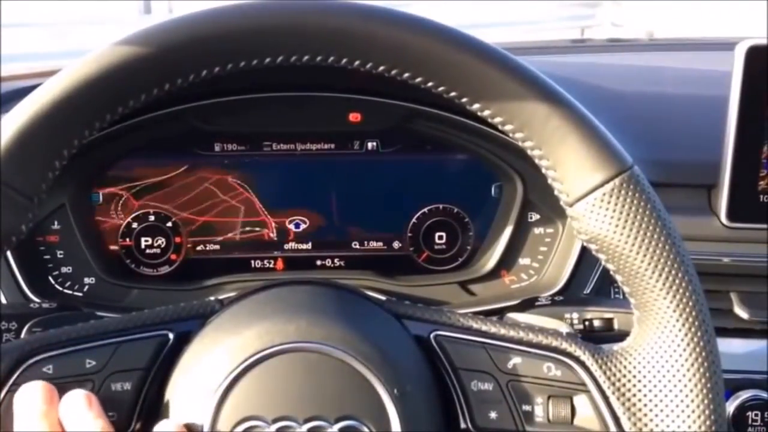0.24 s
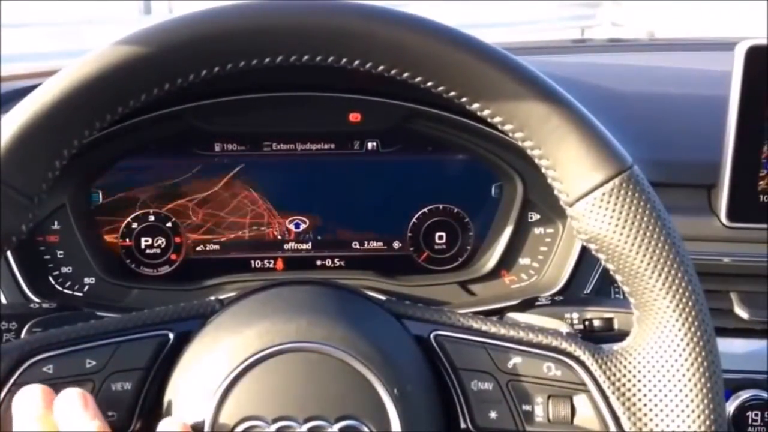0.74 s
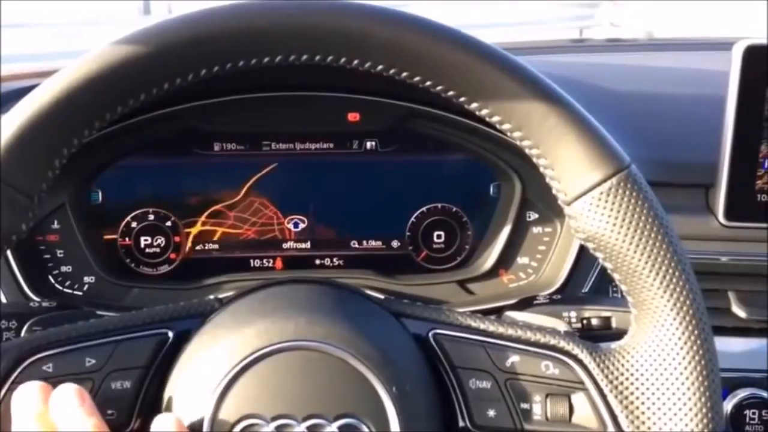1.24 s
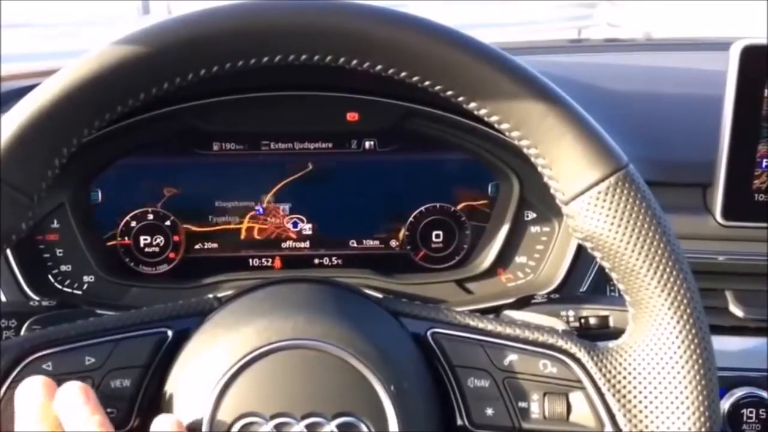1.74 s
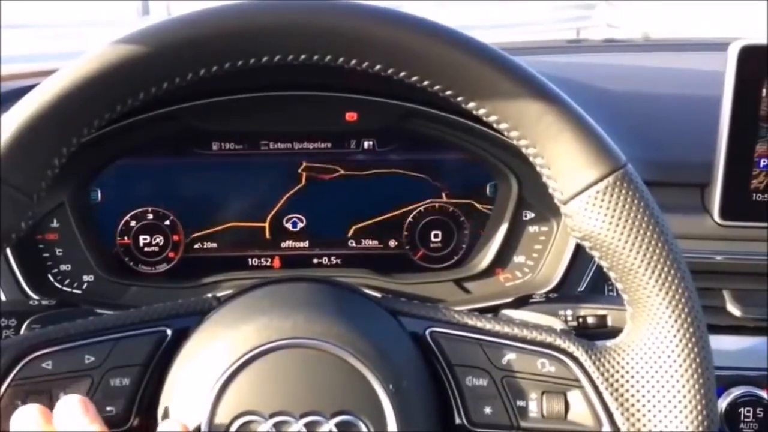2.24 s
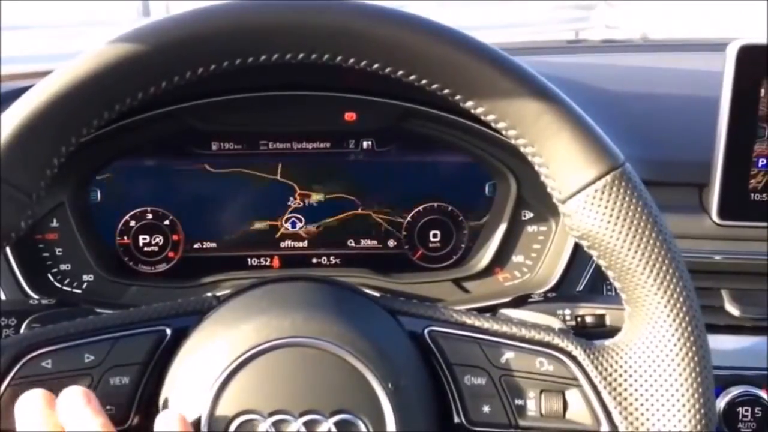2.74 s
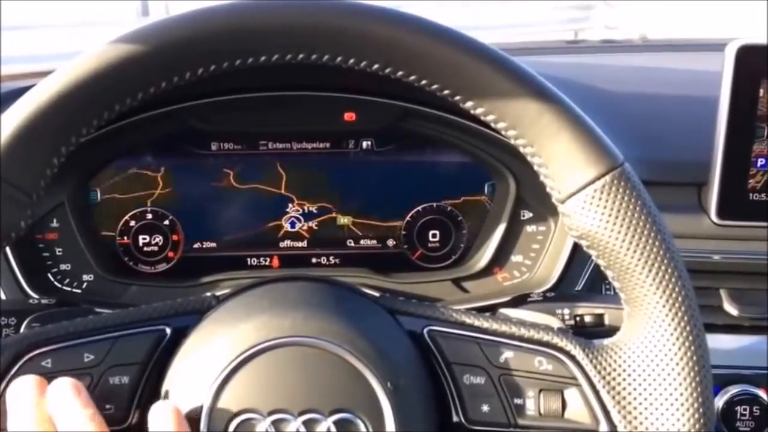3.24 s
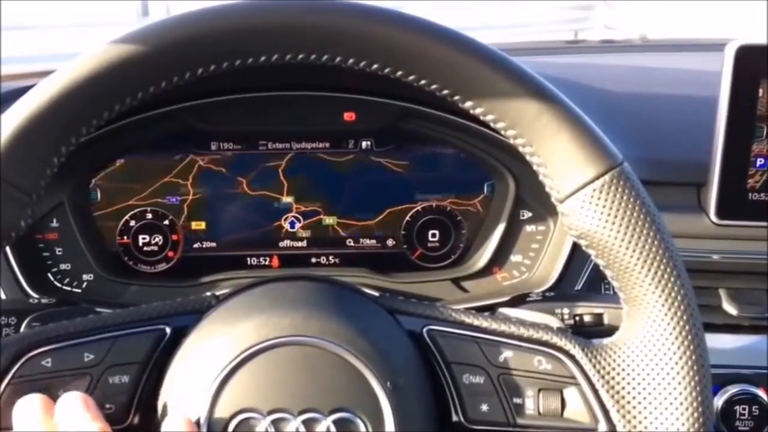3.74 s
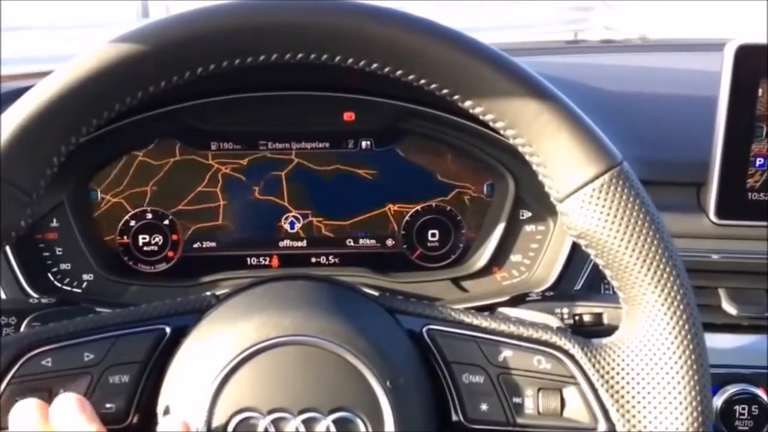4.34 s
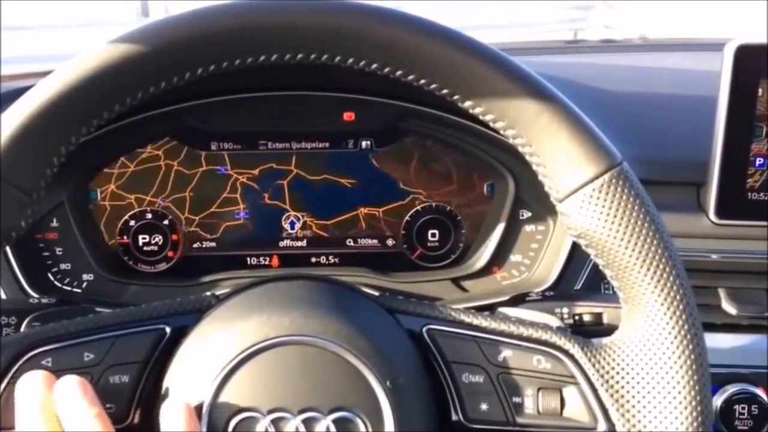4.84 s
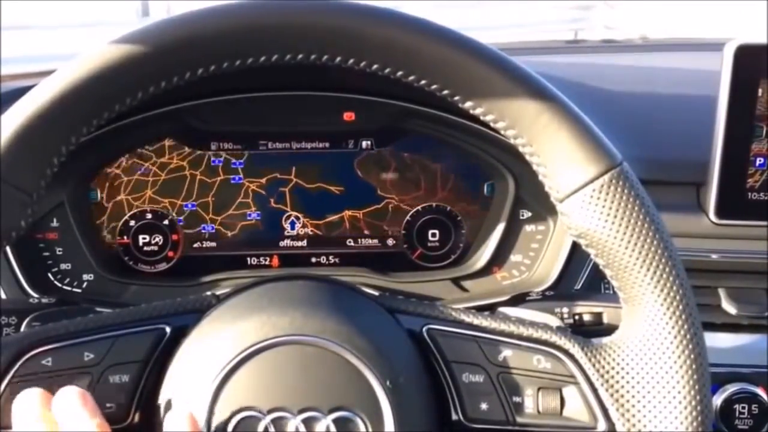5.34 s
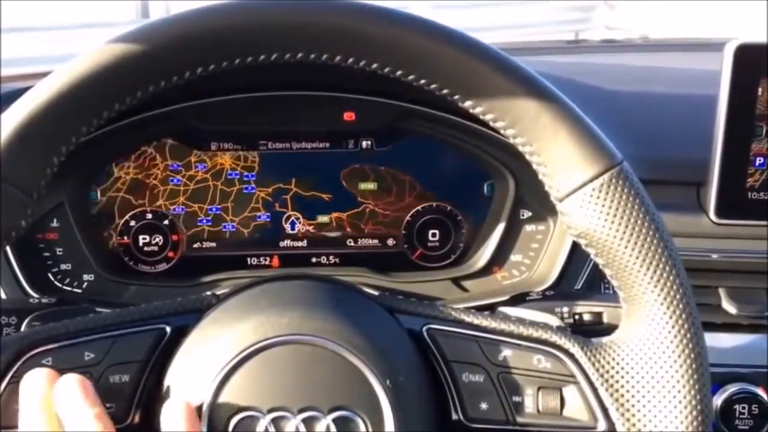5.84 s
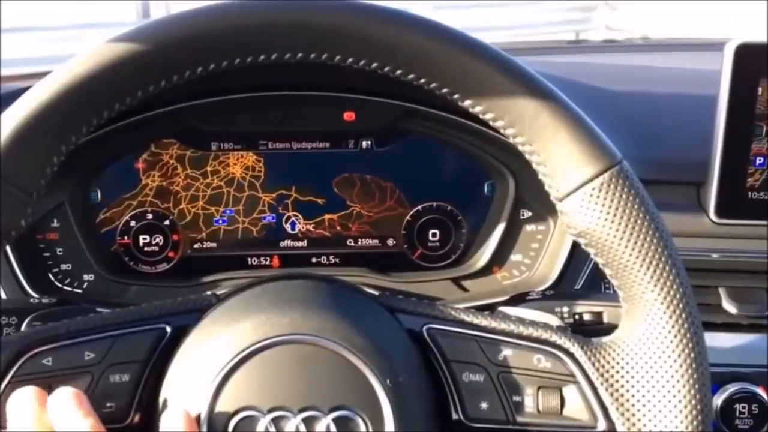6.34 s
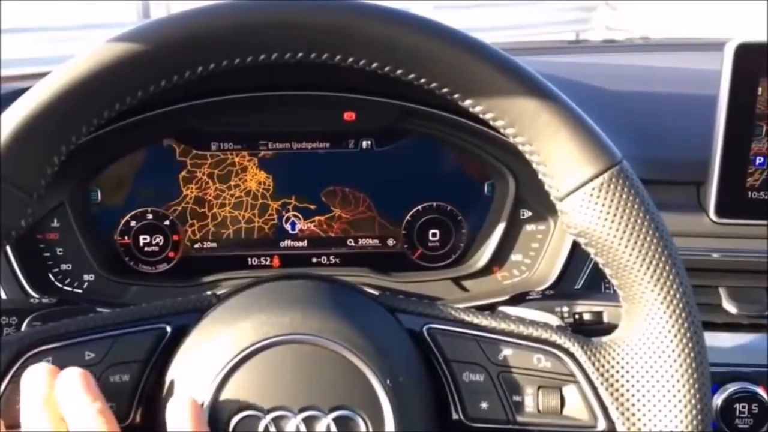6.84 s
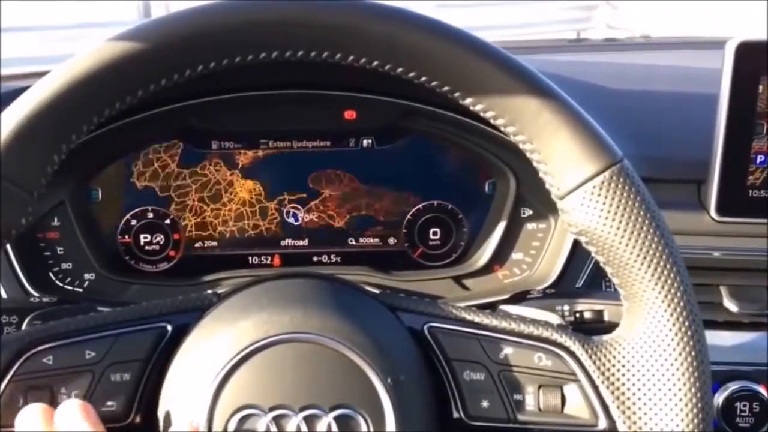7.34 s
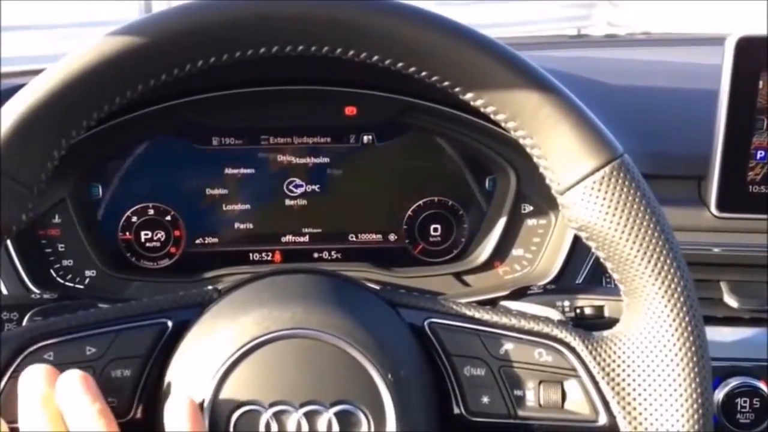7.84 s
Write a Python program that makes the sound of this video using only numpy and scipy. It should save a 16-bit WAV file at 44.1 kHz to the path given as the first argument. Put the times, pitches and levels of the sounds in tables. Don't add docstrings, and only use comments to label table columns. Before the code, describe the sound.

A thumbwheel on a steering wheel ratchets in quick, dry little bursts over the low steady drone of an idling parked car.

```python
import sys
import numpy as np
from scipy import signal
from scipy.fft import rfft, irfft, next_fast_len
from scipy.io import wavfile

SR = 44100
rng = np.random.default_rng(int(sys.argv[2]) if len(sys.argv) > 2 else 0)


def amplitude_ratio(level_db):
    exponent = np.asarray(level_db, float) / 20
    return 10 ** exponent


def waveform_to_disk(signal):
    frames = np.transpose(np.atleast_2d(signal))
    scaled = np.clip(frames, -1, 1) * 32767
    samples = np.round(scaled).astype(np.int16)
    wavfile.write(sys.argv[1], SR, samples)


N = 357210

FIRING_HZ = 28.6
DROPOUT_HALF = 941
# (fullest [s], dying away [s], skin rub [dB], grip on the spoke [dB],
# lowest wheel peak against rattle [dB])
THUMB_STROKES = [(.295, .045, -76, 0, -6), (.777, .22, -74, 3, -9), (1.306, .115, -73, 2, -11),
                 (1.74, .13, -70, 3, -11), (2.116, .32, -75.5, 4, -3), (2.513, .2, -73.5, 4, -18),
                 (2.92, .13, -70, -1, -20), (3.31, .19, -71.5, 2, -7), (3.673, .21, -70.5, 0, -8),
                 (4.007, .053, -71.5, 4, -18), (4.212, .04, -76, 0, -11), (4.326, .054, -64.5, 0, -19),
                 (4.642, .21, -69.5, 2, -8), (4.967, .18, -72, -1, -10), (5.322, .1, -68.5, 0, -12),
                 (5.645, .075, -67.5, 0, -20), (5.952, .18, -71.5, 2, -17), (6.545, .018, -64, 0, -5),
                 (6.625, .05, -76, 2, -14), (6.917, .17, -67, 3.5, -5), (7.243, .21, -67, 4.5, -16),
                 (7.614, .19, -63.5, 0, -20), (7.97, .03, -72, 3, -12), (8.004, .036, -63.5, 0, -8)]


def rms_one(x):
    return x / np.sqrt(np.mean(x ** 2) + 1e-20)


def level_curve(rows):
    s, level_db = np.transpose(rows)
    return amplitude_ratio(np.interp(np.arange(N) / SR, s, level_db, -200, -200))


def coloured(spectrum):
    size = next_fast_len(N)
    hz, level_db = np.transpose(spectrum)
    bins_hz = np.arange(size // 2 + 1) * SR / size
    shape_db = np.interp(np.log(bins_hz + 1e-3), np.log(hz), level_db, -90, -90)
    return rms_one(irfft(rfft(rng.standard_normal(size)) * amplitude_ratio(shape_db), size)[:N])


def drift(rate):
    r = np.exp(-80 * np.pi * rate / SR)
    slow = signal.lfilter([1], [1, -2 * r, r * r], rng.standard_normal(N // 40 + 4002))
    slow = slow[4000:]
    return np.interp(np.arange(N) / 40, np.arange(len(slow)), rms_one(slow))


def resonance(x, hz, width):
    r = np.exp(-np.pi * width / SR)
    poles = [1, -2 * r * np.cos(2 * np.pi * hz / SR), r * r]
    return signal.lfilter([(1 - r * r) / 2, 0, (r * r - 1) / 2], poles, x)


def grit(spread_db):
    noise = rng.standard_normal(N)
    return rms_one(noise * amplitude_ratio(spread_db * np.minimum(rng.exponential(1, N), 4)))


def engine():
    # (multiple of the firing rate [1], level [dB rms])
    order_levels = [(1, -62), (1.5, -65.5), (2, -51.5), (3, -56.5), (3.5, -76.5), (4, -63.5), (5, -78),
                    (6, -71), (8, -78.5), (9, -72), (10, -76), (11, -85.5), (12, -68), (13, -71.5),
                    (15, -85), (17, -89.5)]
    # (frequency [Hz], level [dB rms])
    auxiliary = [(45, -75.5), (68, -62.5), (117, -63.5), (266, -79), (293, -78.5)]
    turn = 2 * np.pi * np.arange(N) / SR
    tones = [(FIRING_HZ * order, db) for order, db in order_levels] + list(auxiliary)
    wander = 0.0071 * drift(0.2)
    waver = [drift(4.4), drift(1.3), drift(0.94)]
    out = np.zeros(N)
    for k, (hz, db) in enumerate(tones):
        start = np.pi / 2 * (hz / FIRING_HZ) ** 2
        level = np.sqrt(2) * amplitude_ratio(db + 0.8 * waver[k % 3])
        out += level * np.sin(hz * (turn + wander / 10) + start)
    return out


def cabin_air():
    # (frequency [Hz], density [dB per Hz])
    rumble_colour = [(20, -26.5), (28, -15), (38, -10.5), (48, -2.5), (65, -2), (95, -2), (125, -1.5),
                     (150, -7), (250, -8.5), (370, -12.5), (400, -23.5), (460, -26), (600, -33)]
    # (frequency [Hz], density [dB per Hz])
    vent_colour = [(250, -38), (430, 0), (485, -10.5), (584, -5), (822, -9.5), (865, -6.5), (1030, -11),
                   (1160, -9.5), (1260, -12), (1440, -9), (1680, -10), (1930, -12.5), (2150, -18),
                   (2310, -21), (3300, -42), (4290, -54), (7260, -120)]
    # (frequency [Hz], density [dB per Hz])
    hiss_colour = [(1590, -58), (2700, -5), (2950, -1), (3130, -1), (3670, -4), (4250, -3.5), (4820, -8.5),
                   (5220, -7), (6270, -6), (8920, -9.5), (10200, -7.5), (12100, -10.5), (15600, -11)]
    # (time [s], level [dB])
    outside_swell = [
        (0, -0.5),
        (1.5, 0),
        (3, .5),
        (4.5, 0),
        (6, 1),
        (7.3, -1),
        (7.7, 2),
        (8.1, 1),
    ]
    # (frequency [Hz], width [Hz], level [dB rms])
    vent_pipes = [(588.5, 65, -78), (972, 70, -76.5), (1170, 45, -79.5), (1414, 102, -74), (2050, 120, -82)]
    t = np.arange(N) / SR
    s, swell_db = np.transpose(outside_swell)
    swell = np.interp(t, s, swell_db - np.mean(swell_db))
    throb_db = 1.3 * np.sin(np.pi * FIRING_HZ * t)
    rumble = amplitude_ratio(-52 + swell + throb_db) * coloured(rumble_colour)
    vent = amplitude_ratio(-65 + 0.5 * drift(5)) * coloured(vent_colour)
    air = rng.standard_normal(N)
    pipes = np.zeros(N)
    for hz, width, db in vent_pipes:
        pipes += amplitude_ratio(db) * rms_one(resonance(resonance(air, hz, width), hz, width))
    return rumble + vent + pipes + amplitude_ratio(-82.5) * coloured(hiss_colour)


def thumb_rub(grip_share):
    rise_s = 0.043
    out = np.zeros(N)
    for fullest, fall, db, grip_db, _ in THUMB_STROKES:
        start, end = fullest - rise_s, fullest + fall
        at = np.arange(int(start * SR), min(int(end * SR), N))
        ramp = np.interp(at / SR, [start, fullest, end], [0, 1, 0])
        out[at] += amplitude_ratio(db + grip_share * grip_db) * np.sin(np.pi / 2 * ramp) ** 2.23
    return out


def detents():
    # (first notch [s], rattle [dB], loss a notch [dB], gaps to the next notches [s] ..)
    rolls = [(.301, -61.5, 9, .0941), (.797, -62, 5, .0413, .103), (1.2736, -61, 2, .0504, .0441),
             (1.7422, -57, 17, .0881), (2.1428, -54, 7, .026, .0438), (2.5342, -57, 7.5, .0342),
             (2.9288, -60, 3.5, .0331, .0375), (3.3217, -55, 5, .0268, .0471),
             (3.6885, -53, 7, .0265, .0393), (4.0112, -64, 2.1, .037), (4.314, -61, 2.5, .0231, .034),
             (4.645, -55, 6, .033, .0467), (4.979, -61, 5, .0386), (5.298, -60, 3, .0294, .0346),
             (5.6486, -58, 5.5, .0131, .0383), (5.9414, -65, -1.5, .0354, .0326),
             (6.534, -59, 3.5, .0155, .0266), (6.9363, -57, 4.5, .0236, .0281), (7.3199, -61, 4, .0275),
             (7.6299, -55, 4, .0199, .0185), (7.689, -61, 3.5, .0178), (8.0218, -55.5, 16, .0567)]
    # (time [s], rattle [dB])
    slips = [
        (1.491, -63.5),
        (3.0586, -67),
        (4.4296, -66.5),
        (5.9677, -69),
        (6.6114, -73),
        (6.636, -67),
        (6.921, -63),
        (6.9478, -70),
        (7.6803, -67),
        (8.005, -58),
    ]
    # (time [s], rattle [dB])
    touches = [(.6809, -71), (1.2147, -72.5), (1.6384, -73), (2.0262, -76), (2.4057, -75), (2.7904, -73),
               (3.1961, -75), (3.906, -72), (4.2097, -70), (4.5474, -71), (4.6112, -75), (4.8677, -78),
               (5.2114, -73), (5.5647, -71.5), (5.8705, -74), (6.7552, -75), (6.8402, -71), (7.197, -68.5),
               (7.2249, -70.5), (7.2588, -70), (7.5461, -68.5), (7.8992, -72), (7.9501, -74)]
    notch_spoke_db, notch_lowest_db = [-8, -13, -12], [-2, 4, -3]
    lone_lowest_db = -2.5
    rows = []
    for s, db, loss_db, *gaps in rolls:
        for k in range(len(gaps) + 1):
            rows.append((s + sum(gaps[:k]), db - k * loss_db, notch_spoke_db[k], notch_lowest_db[k]))
    rows += [(s, db, -6, lone_lowest_db) for s, db in slips]
    rows += [(s, db, -1, lone_lowest_db) for s, db in touches]
    s, rattle_db, spoke_db, lowest_db = np.transpose(rows)
    fullest, _, _, grip_db, ring_db = np.transpose(THUMB_STROKES)
    spoke_db = spoke_db + 0.8 * np.interp(s, fullest, grip_db)
    return s, rattle_db, spoke_db, lowest_db + np.interp(s, fullest, ring_db)


def detent_shape(rise_s, fall_s, skirt_db, skirt_s):
    t = np.arange(-1300, 1301) / SR
    crest = np.exp(np.where(t < 0, t / rise_s, -t / fall_s))
    return crest + amplitude_ratio(skirt_db) * np.exp(-np.abs(t) / skirt_s)


def thumbwheel():
    # (frequency [Hz], width [Hz], level [dB])
    wheel_peaks = [(4520, 460, -1), (6200, 240, -5.5), (7880, 680, -13), (8910, 350, -3), (9800, 390, -5),
                   (11060, 340, -3.5), (13000, 340, -4.5), (14700, 1300, -20)]
    # (frequency [Hz], width [Hz], level [dB])
    spoke_peaks = [(1950, 180, 5.5), (2270, 310, 1.5), (3050, 250, .5)]
    s, rattle_db, spoke_db, lowest_db = detents()
    at = (s * SR).astype(int)
    luck = rng.standard_normal((len(s), len(wheel_peaks) + len(spoke_peaks)))
    rub, spoke_rub = thumb_rub(grip_share=0), thumb_rub(grip_share=1)
    sharp = detent_shape(rise_s=0.0024, fall_s=0.002, skirt_db=-11, skirt_s=0.007)
    soft = detent_shape(rise_s=0.0062, fall_s=0.0059, skirt_db=-10.5, skirt_s=0.012)
    contact, skin = grit(spread_db=0.0), grit(spread_db=0.5)
    out = np.zeros(N)
    for k, (hz, width, db) in enumerate(list(wheel_peaks) + list(spoke_peaks)):
        in_spoke = k >= len(wheel_peaks)
        if in_spoke:
            share_db = spoke_db + 3.5
        elif k == 0:
            share_db = lowest_db + 3.5 + 1.5 * luck[:, 0]
        else:
            share_db = 2.9 * luck[:, k]
        blows = np.zeros(N)
        blows[at] = amplitude_ratio(rattle_db + 4.5 + share_db)
        envelope = signal.oaconvolve(blows, soft if in_spoke else sharp, "same")
        rattle = resonance(contact * envelope, hz, width)
        stroke = (spoke_rub if in_spoke else rub) * amplitude_ratio(4.0)
        patches = amplitude_ratio(2.2 * drift(14))
        rubbing = resonance(skin * stroke * patches, hz, 0.52 * width)
        out += (-1) ** k * amplitude_ratio(db + 4.5) * (rattle + rubbing)
    highpass = signal.butter(2, 3500, "high", fs=SR, output="sos")
    broad = signal.sosfilt(highpass, grit(spread_db=-1.0))
    blows = np.zeros(N)
    blows[at] = amplitude_ratio(rattle_db + 4.5)
    scratch = amplitude_ratio(3.5) * rub * amplitude_ratio(2.6 * drift(83))
    return out + amplitude_ratio(-11) * broad * np.hypot(scratch, signal.oaconvolve(blows, sharp, "same"))


def frame_at(s):
    first_s = 0.3643
    centre = round(first_s * SR) + DROPOUT_HALF * round((s - first_s) * SR / DROPOUT_HALF)
    return slice(centre - DROPOUT_HALF, centre + DROPOUT_HALF)


def treble_dropouts(x):
    # (centre [s], emptied above [Hz], share left [0-1], chance lines that survive [count])
    starved = [(.3643, 2600, .3, 0), (1.7723, 700, 0, 3), (2.071, 2400, 0, 0), (2.1563, 600, 0, 2),
               (2.6256, 2600, .2, 0), (2.7536, 2400, 0, 0), (3.3083, 2200, 0, 1), (3.9483, 2600, 0, 0),
               (4.439, 2500, .2, 0), (4.567, 2600, .2, 1), (5.6763, 1800, .1, 0), (5.9536, 2300, .1, 0),
               (7.2763, 700, 0, 1), (7.9803, 700, 0, 1), (8.0443, 2400, 0, 1), (8.0656, 2400, 0, 1)]
    # (centre [s], frequency [Hz], level [dB rms])
    whistles = [(.3643, 4400, -90), (2.6256, 5900, -90), (4.439, 13500, -83), (2.1563, 8950, -75),
                (7.9803, 4371, -77.5), (1.7723, 4380, -78), (1.7723, 8800, -76), (2.1563, 4780, -75),
                (2.1563, 1950, -68), (3.3083, 13000, -72), (4.439, 8350, -81), (5.6763, 13100, -79),
                (5.9536, 6050, -77), (7.2763, 1950, -64), (7.2763, 3050, -73), (7.9803, 1950, -70),
                (7.9803, 10852, -80), (7.9803, 9800, -77), (7.9803, 12984, -78), (8.0443, 4715, -72),
                (8.0443, 9000, -75), (8.0656, 4630, -79), (8.0656, 9840, -77)]
    n, line = np.arange(2 * DROPOUT_HALF), np.arange(DROPOUT_HALF)
    window = np.sin(np.pi * (n + 0.5) / (2 * DROPOUT_HALF))
    phase = np.pi / DROPOUT_HALF * (n + 0.5 + DROPOUT_HALF / 2) * (line[:, None] + 0.5)
    basis = window * np.cos(phase)
    line_hz = line * SR / (2 * DROPOUT_HALF)
    band = line // 32
    favour = amplitude_ratio(0.6 * np.log2(np.arange(band[-1] + 1) + 1))
    padded = np.pad(x, (0, DROPOUT_HALF))
    out = padded.copy()
    for s, above_hz, left, lone in starved:
        span = frame_at(s)
        lines = basis @ padded[span] * (line_hz > above_hz)
        kept = left * lines
        band_size = np.sqrt(np.bincount(band, lines ** 2))
        for b in np.argsort(-band_size * favour)[:lone]:
            top = np.argmax(np.abs(lines) * (band == b))
            kept[top] = np.sign(lines[top]) * band_size[b] * amplitude_ratio(-1.5)
        out[span] += 2 / DROPOUT_HALF * (kept - lines) @ basis
    for s, hz, db in whistles:
        out[frame_at(s)] += np.sqrt(2) * amplitude_ratio(db) * basis[int(hz * 2 * DROPOUT_HALF / SR)]
    return out[:N]


def trim_knocks():
    # (time [s], peak [dB], softness [Hz])
    knocks = [
        (1.987, -57, 2500),
        (4.031, -52, 2500),
        (4.6858, -37, 4000),
        (6.598, -55, 2500),
        (6.624, -55, 2500),
        (6.66, -69, 2000),
        (6.915, -54, 3000),
        (7.948, -57, 2980),
    ]
    # (frequency [Hz], level [dB], t60 [s])
    trim_modes = [(837, -5.5, 0.043), (1010, -4, 0.05), (1114, 1.5, 0.046), (1324, 2.5, 0.042),
                  (1556, 1, .04), (1700, -2.5, 0.026), (1730, -2, 0.039), (2090, 3, 0.045),
                  (2350, -7, 0.053), (2590, -3, 0.053), (3105, -12, 0.041)]
    # (time [s], frequency [Hz], peak [dB], t60 [s])
    pings = [
        (1.988, 1900, -50.5, .03),
        (2.672, 2700, -64, .04),
        (4.031, 1890, -51, 0.034),
        (6.597, 1660, -49, .04),
        (6.599, 2050, -53, .03),
        (6.66, 1700, -51.5, 0.043),
        (6.912, 2310, -53.5, .04),
        (7.949, 1700, -60, .03),
    ]
    out, t = np.zeros(N), np.arange(4000) / SR
    crack_band = signal.butter(2, [2800, 5600], "band", fs=SR, output="sos")
    for s, db, soft_hz in knocks:
        chatter = rng.standard_normal(len(t)) * np.exp(-t / 0.005) * amplitude_ratio(-31)
        chatter[0] = 1
        chatter[round(0.0094 * SR)] = amplitude_ratio(-4.5)
        blow = signal.lfilter(*signal.butter(1, soft_hz, fs=SR), chatter)
        rings = np.zeros(len(t))
        for k, (hz, level_db, t60) in enumerate(trim_modes):
            strength_db = level_db + 0.8 * rng.standard_normal()
            rings += (-1) ** k * amplitude_ratio(strength_db - 60 * t / t60) * np.sin(2 * np.pi * hz * t)
        knock = signal.fftconvolve(blow, rings)[:len(t)]
        crack = signal.sosfilt(crack_band, rng.standard_normal(len(t)) * np.exp(-t / 0.0077))
        out[round(s * SR):][:len(t)] += amplitude_ratio(db) * (knock / np.abs(knock).max() + amplitude_ratio(-11.5) * crack)
    for s, hz, db, t60 in pings:
        attack = np.minimum(t / 0.00043, 1)
        out[round(s * SR):][:len(t)] += amplitude_ratio(db - 60 * t / t60) * np.sin(2 * np.pi * hz * t) * attack
    return out


def grip_creak():
    # (time [s], level [dB], creak pitch [Hz])
    creak_path = [
        (6.59, -85, 1650),
        (6.62, -66.5, 1690),
        (6.68, -69, 1700),
        (6.71, -70, 2050),
        (6.76, -66.5, 2160),
        (6.81, -75, 2120),
        (6.9, -76, 2050),
    ]
    # (frequency [Hz], width [Hz])
    creak_peaks = [(1680, 150), (1880, 160), (2090, 77)]
    s, level_db, pitch_hz = np.transpose(creak_path)
    pitch_hz = np.interp(np.arange(N) / SR, s, pitch_hz)
    stick_slip = grit(spread_db=1.2) * amplitude_ratio(0.8 * drift(60))
    creak = amplitude_ratio(-17) * rms_one(resonance(stick_slip, hz=3430, width=300))
    for hz, width in creak_peaks:
        nearness = np.exp(-((pitch_hz - hz) / 300) ** 2)
        once = resonance(stick_slip, hz, 1.5 * width)
        creak += nearness * rms_one(resonance(once, hz, 1.5 * width))
    return level_curve(np.transpose([s, level_db])) * creak


def scene():
    return (engine() + cabin_air() + thumbwheel() + trim_knocks() + grip_creak())[None]


def band_limit(x):
    return signal.sosfilt(signal.butter(12, 15710, fs=SR, output="sos"), x)


def record(dry):
    heard = dry[0] - 0.5 * resonance(dry[0], hz=10350, width=420)
    heard = signal.sosfilt(signal.ellip(10, 0.5, 50, 15750, fs=SR, output="sos"), heard)
    mix = treble_dropouts(heard)[None]
    return band_limit(mix)


dry = scene()
out = record(dry)
waveform_to_disk(out)
```